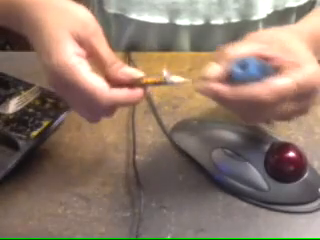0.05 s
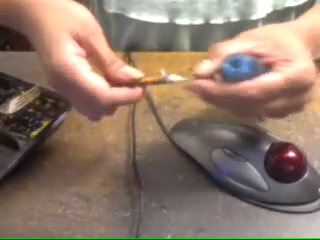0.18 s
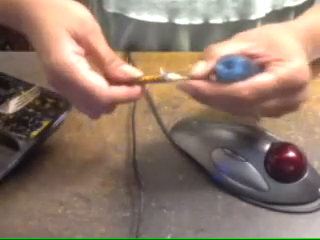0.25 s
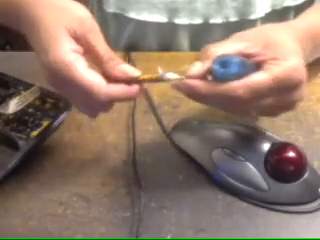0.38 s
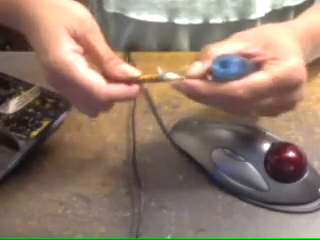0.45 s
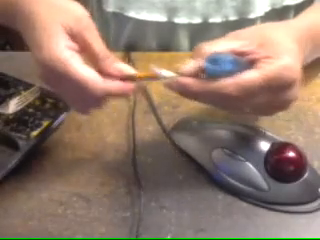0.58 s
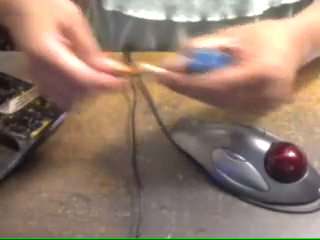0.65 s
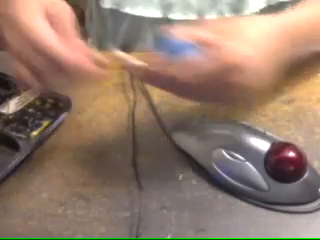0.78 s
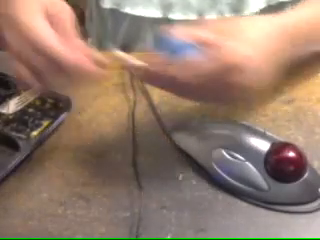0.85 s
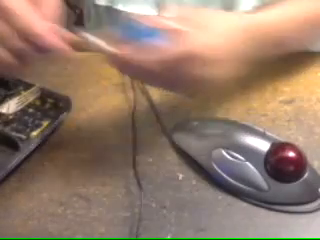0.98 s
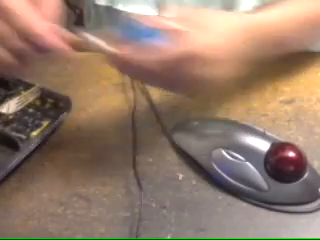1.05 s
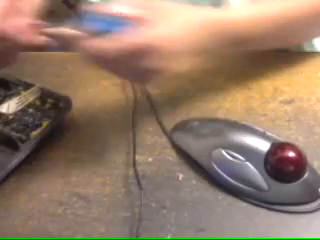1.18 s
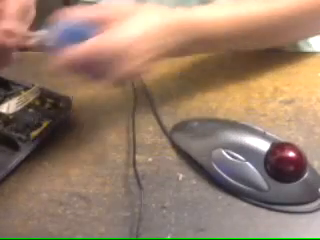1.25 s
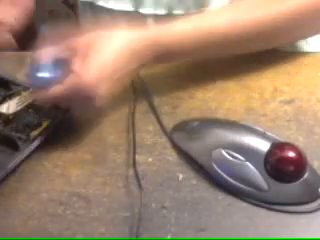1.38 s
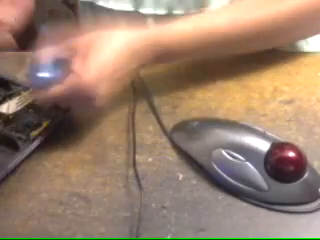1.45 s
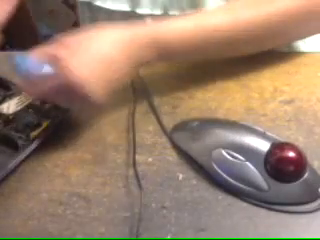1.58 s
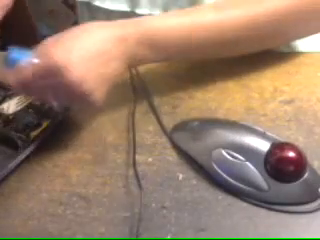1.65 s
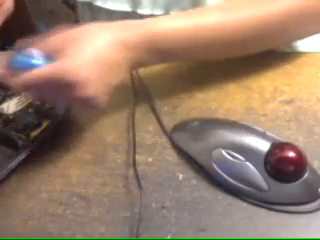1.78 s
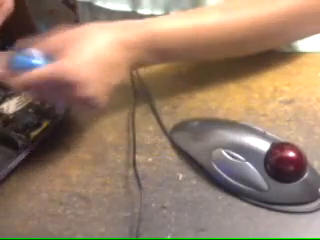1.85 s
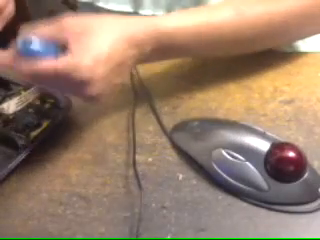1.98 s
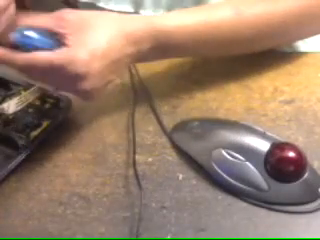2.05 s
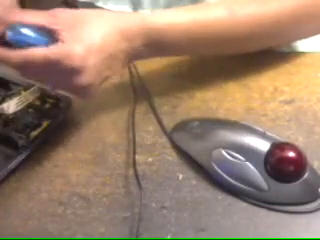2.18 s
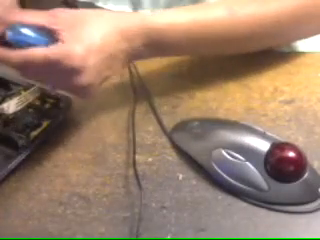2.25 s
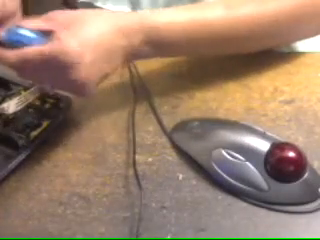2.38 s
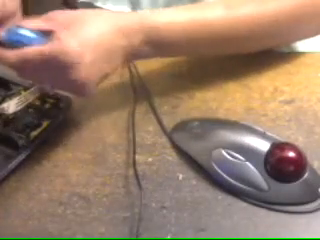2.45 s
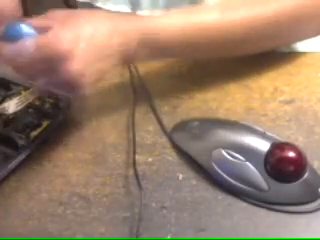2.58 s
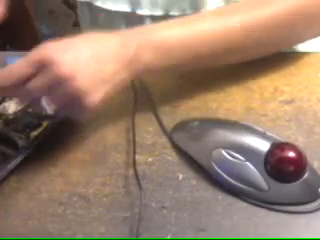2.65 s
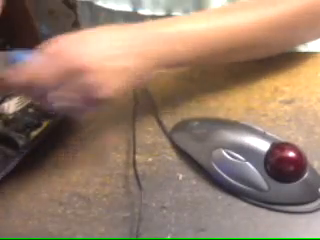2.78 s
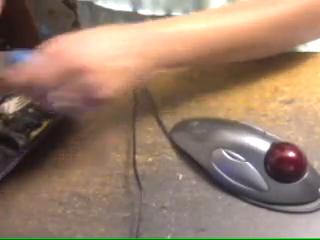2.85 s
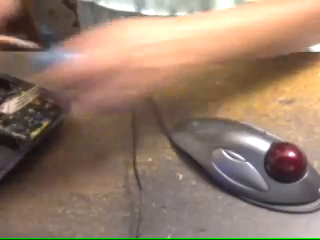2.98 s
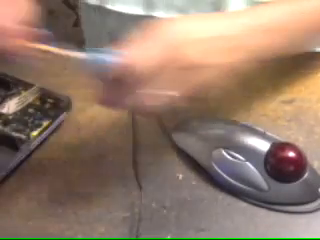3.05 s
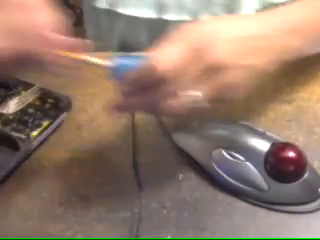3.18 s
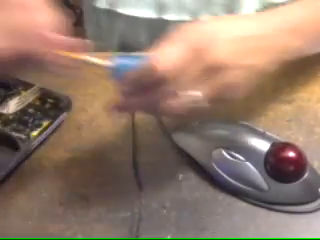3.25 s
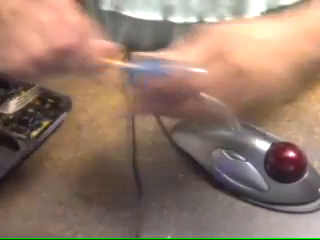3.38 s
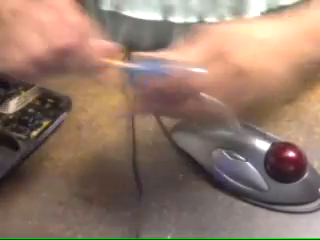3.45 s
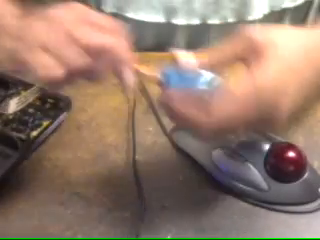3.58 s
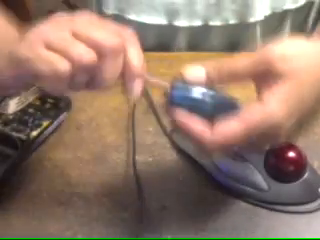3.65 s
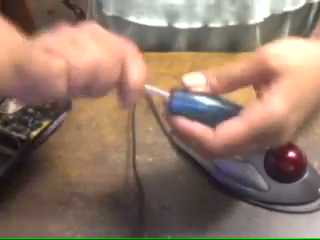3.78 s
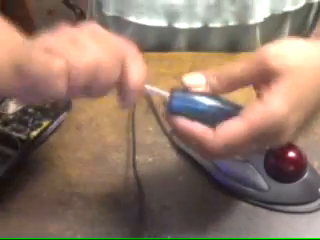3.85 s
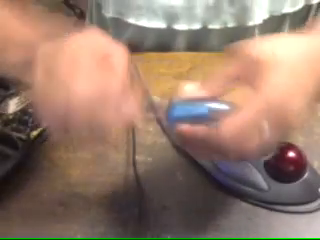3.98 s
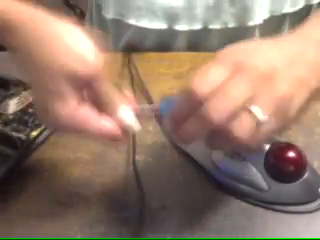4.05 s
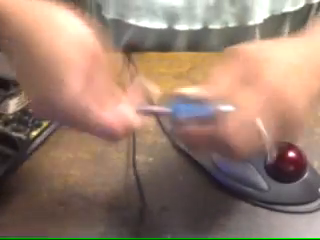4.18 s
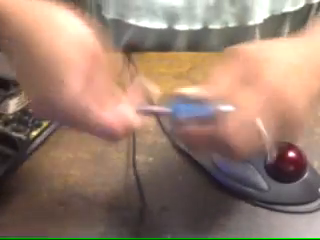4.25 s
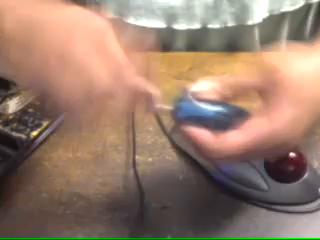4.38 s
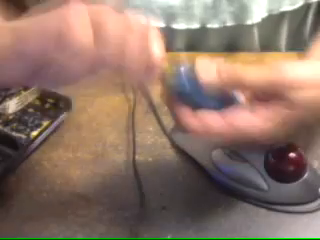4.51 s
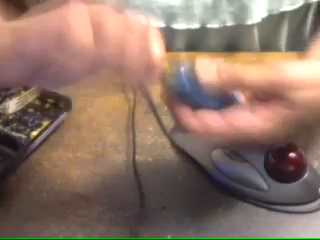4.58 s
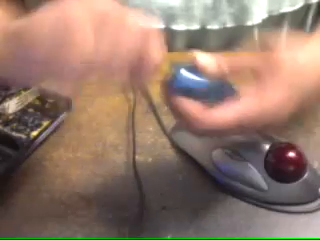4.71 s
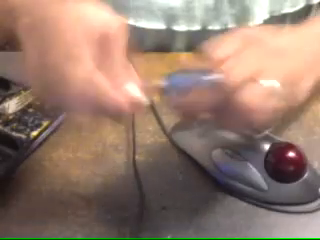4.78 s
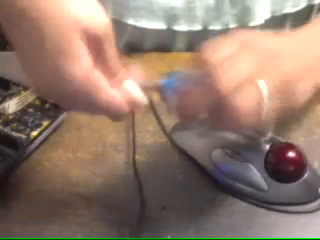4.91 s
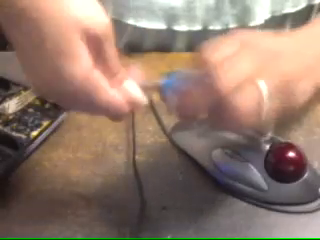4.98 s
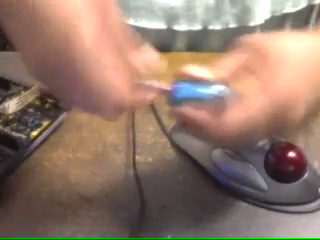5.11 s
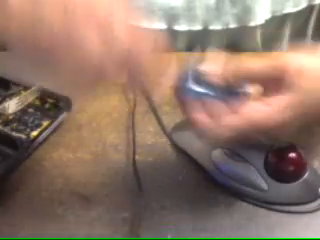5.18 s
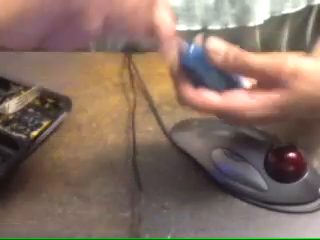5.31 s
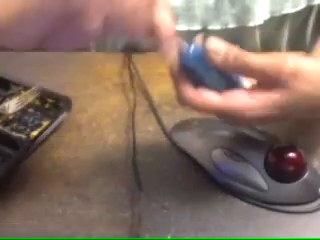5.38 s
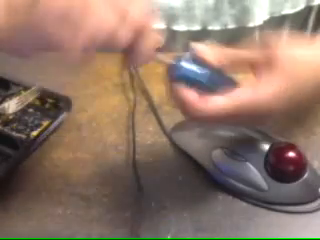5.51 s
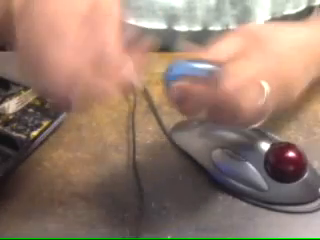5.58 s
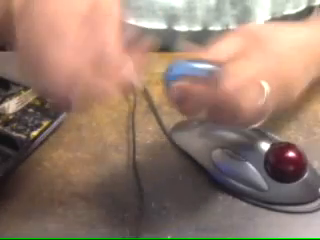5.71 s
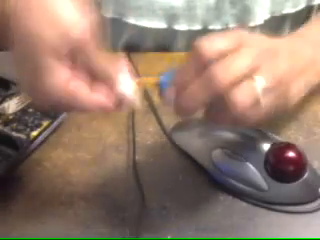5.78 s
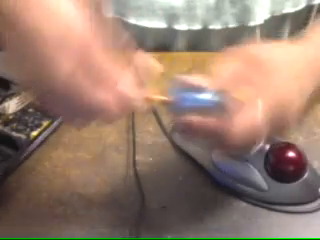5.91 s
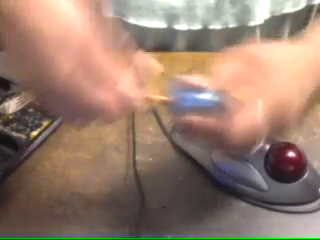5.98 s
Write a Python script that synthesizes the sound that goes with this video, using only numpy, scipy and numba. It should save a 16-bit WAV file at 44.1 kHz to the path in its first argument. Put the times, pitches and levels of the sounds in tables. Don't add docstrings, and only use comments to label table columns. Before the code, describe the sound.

A quiet room: low fan rumble, faint mains hum and a dull distant clock tick every second from about 0.5 s. Nearly nothing else until 1.2 s, when tiny plastic taps begin, clustering at 1.4 s with a light finger rub. A crisp, harder click comes at 2.0 s. Faint rubs and ticks follow at 2.5-2.9 s, then a soft slide at 3.5 s and small clicks at 3.6-3.7 s as the pencil is fitted. At 4.05-4.25 s the first twist gives a short, dry, crunchy rasp with clacks, then a knock at 4.3 s. A weaker, scratchier twist runs 4.77-5.0 s, with knocks near 4.96 s and small rattles after. A sharp clack hits at 5.28 s. The third scrape runs 5.65-5.9 s, topped at 5.73 s by the loudest knock, with a low desk thump. Close, dry, band-limited microphone with slightly watery grain.

```python
import sys
import numpy as np
from scipy import signal
from scipy.io import wavfile
from scipy.ndimage import uniform_filter1d
from numba import njit

SR = 44100
rng = np.random.default_rng(int(sys.argv[2]) if len(sys.argv) > 2 else 0)


def natural_amplitude(level_db):
    exponent = np.asarray(level_db, float) / 20
    return 10 ** exponent


def int16_out(signal):
    q = np.round(np.clip(np.atleast_2d(signal).T, -1, 1) * 32767)
    wavfile.write(sys.argv[1], SR, q.astype(np.int16))


N = 266364


@njit
def svf(x, hz, width):
    y, b, l = np.empty(len(x)), 0., 0.
    g, k = np.tan(np.pi * hz / SR), width / hz
    for i in range(len(x)):
        v = (b + g * (x[i] - l)) / (1 + g * (g + k))
        b, l, y[i] = 2 * v - b, l + 2 * g * v, k * v
    return y


def unit(x):
    return x / np.sqrt(np.mean(x ** 2))


def ring(x, modes):
    out = 0
    for k, (hz, width, db) in enumerate(modes):
        out = out + (-1) ** k * natural_amplitude(db) * svf(x, 1. * hz, 1. * width)
    return out


def walk(rate):
    hold = int(SR / rate)
    return uniform_filter1d(np.repeat(rng.standard_normal(N // hold + 1), hold), hold)[:N]


def burst(noise, rise_s, fall_s, tail_s, tail_db):
    t = np.arange(len(noise)) / SR
    decay = np.exp(-t / fall_s) + natural_amplitude(tail_db) * np.exp(-t / tail_s)
    return noise * (1 - np.exp(-t / rise_s)) * decay


def add(out, s, x):
    i = int(s * SR)
    out[i:i + len(x)] += x[:len(out) - i]


# [t/s, cutting effort level/dB, shell freedom in the grip level/dB]
TWISTS = [
    [(4.042, -75, -4), (4.066, -61, -7), (4.085, -48.5, -7), (4.1, -50, -1.5), (4.114, -39.5, -9.5),
     (4.128, -45.5, -4), (4.174, -33, -6.5), (4.232, -65, -4), (4.275, -72.5, -10.5)],
    [(4.764, -77, 0), (4.78, -57.5, -15), (4.81, -51.5, 3.5), (4.86, -58, -4), (4.895, -54.5, 2.5),
     (4.92, -44.5, -7), (4.964, -43.5, -5), (4.982, -50, -3), (5.012, -62.5, 0)],
    [(5.602, -84.5, -19.5), (5.652, -60.5, -12.5), (5.672, -44, -14), (5.684, -53.5, -9.5),
     (5.715, -53.5, -14), (5.765, -47.5, -30.5), (5.8, -54, -5), (5.875, -50.5, -1), (5.95, -72.5, -3.5)],
]
# [start level/dB, end level/dB]
TWIST_CUP_DB = [(-13, -5), (-26, -0.5), (-15, -14.5)]
# [t/s, level/dB, time to fade 30 dB/s, shell level/dB, blade level/dB]
SLIDES = [(.142, -70, 0.1, -26, 8), (1.447, -65.5, 0.15, -3.5, 6), (1.777, -72, 0.09, 6.5, 5),
          (2.49, -94, 0.1, 11, 7), (2.605, -74.5, 0.07, 3, 14.5), (2.635, -69.5, .07, -1, 12),
          (2.876, -68.5, 0.05, -22, 10.5), (3.1, -90.5, 0.12, 3.5, 9), (3.475, -61, 0.07, -9, 6.5),
          (3.58, -82, 0.24, 2, 5), (3.69, -62, 0.06, -11, 3.5), (3.75, -80.5, 0.2, -8, 1),
          (4.45, -83, 0.09, -4, 24.5), (3.99, -82, 0.3, -4, 10), (4.67, -84, 0.16, -3.5, 13.5),
          (5.035, -61.5, 0.04, -3.5, -3), (4.37, -82, .15, 0, 0), (5.42, -90.5, 0.55, 0, 12),
          (4.59, -87.5, -0.1, -1, 4.5)]
# [t/s, level/dB, time to fade 30 dB/s, shell level/dB, blade level/dB]
SHAKES = [(1.39, -76.5, .1, -18, 12), (1.611, -75.5, .05, -10, 9.5), (2.79, -65.5, 0.042, -9, 6),
          (3.626, -67.5, .09, -15, 2), (4.416, -71.5, .07, 3.5, 5.5), (4.516, -52, .025, -12, 5),
          (5.085, -52, .018, -6, 0.5), (5.158, -57.5, .05, 0, 3.5), (5.3, -53.5, .06, -1.5, -6),
          (5.33, -62, .1, -12, -8)]


def pressure(twist_fade_db_per_s=450, edge_db=7.5, edge_per_effort=-.3, rub_cup_db=-4):
    t, gain = np.arange(N) / SR, np.zeros((4, N))
    for rows, cup_db in zip(map(np.array, TWISTS), TWIST_CUP_DB):
        s, effort_db, free_db = rows.T
        outside_s = np.maximum(np.maximum(s[0] - t, t - s[-1]), 0)
        wall_db = np.interp(t, s, effort_db) - twist_fade_db_per_s * outside_s
        shell_db = wall_db + np.interp(t, s, free_db)
        twist_cup_db = shell_db + np.interp(t, s[[0, -1]], cup_db)
        blade_db = wall_db + edge_db + edge_per_effort * (np.maximum(wall_db, -66) + 55.5)
        gain += natural_amplitude(np.array([twist_cup_db, shell_db, wall_db, blade_db]))
    for rows, rise in ((SLIDES, .8), (SHAKES, .15)):
        for s, db, fade_s, shell_db, blade_db in rows:
            near = slice(max(int((s - 2 * fade_s) * SR), 0), int((s + 2 * fade_s) * SR))
            swell_db = db - 30 * np.maximum((s - t[near]) / rise, t[near] - s) / fade_s
            parts_db = np.array([[shell_db + rub_cup_db], [shell_db], [0], [blade_db]])
            gain[:, near] += natural_amplitude(swell_db + parts_db)
    return gain


# [f/Hz, width/Hz, level/dB]
CUP = [(732, 266, -0.5), (1262, 480, 1)]
# [f/Hz, width/Hz, level/dB]
GRIPPED = [(1610, 330, -3), (2105, 300, 3), (2680, 500, -2)]
# [f/Hz, width/Hz, level/dB]
WALL = [(3328, 277, 3.5), (3923, 450, 6), (4360, 220, 7), (4817, 590, 3), (5263, 450, -4)]
# [f/Hz, width/Hz, level/dB]
BLADE = [(5683, 720, -8), (6227, 340, -4), (6700, 610, -5), (7435, 396, -3)]


def shaving(slips=2500, scatter_db=4.0, hiss_db=1.5, patchy_db=3.0):
    when = rng.random(N) < slips / SR
    strength = natural_amplitude(scatter_db * np.minimum(rng.exponential(size=N), 2.5))
    torn = when * strength * rng.standard_normal(N)
    force = unit(torn) + natural_amplitude(hiss_db) * rng.standard_normal(N)
    force = force * natural_amplitude(3.8 * walk(90))
    out = 0
    for gain, modes in zip(pressure(), (CUP, GRIPPED, WALL, BLADE)):
        once = ring(force, modes)
        answer = 0
        for k, mode in enumerate(modes):
            answer = answer + (-1) ** k * natural_amplitude(patchy_db * walk(22)) * ring(once, [mode])
        out = out + gain * unit(answer)
    return out


# [f/Hz, width/Hz, level/dB]
SHELL = [(1593, 350, 0.5), (2073, 400, 1.5), (2722, 500, -3)]
# [t/s, level/dB, shell level/dB, blade level/dB]
TAPS = [(1.192, -65, -12, 15.5), (1.274, -54, -20.5, 13), (1.389, -66.5, -12.5, 12.5),
        (1.403, -58, -22, 11.5), (1.417, -65, -19, 6), (1.428, -50.5, -14, 9), (1.439, -42.5, -8, 11),
        (1.448, -47, 1, 10), (1.537, -73.5, 10.5, 10.5), (1.608, -74, 0, 21), (2.074, -66, 5, 2),
        (2.456, -84.5, 26.5, 15), (2.781, -52.5, -11, 10), (3.566, -72.5, 11, 16),
        (3.627, -46.5, -20, -0.5), (3.693, -49.5, -20.5, -17), (3.984, -72.5, -13, 20.5)]
# [t/s, level/dB, shell level/dB, blade level/dB]
KNOCKS = [(4.112, -31, -5.5, -3.5), (4.164, -25, -13, -1.5), (4.175, -25, -2.5, 6.5),
          (4.302, -31, 1.5, -2.5), (4.958, -32, -8, 6.5), (4.967, -44, -1, 11.5), (5.07, -39, 0.5, -18),
          (5.2745, -49.5, 0.5, -4), (5.277, -20, -5.5, -7.5), (5.719, -29.5, -13.5, 1),
          (5.728, -14.5, -6.5, 0.5), (5.746, -60.5, -14, 10)]
# [t/s, level/dB, shell level/dB, blade
# level/dB]
DRY_CONTACTS = [(2.022, -32, -7, -3.5), (4.064, -47, -3, 2), (4.191, -45, 4, -0.5), (4.414, -58.5, -3, 0),
                (4.514, -47.5, -6.5, 8.5), (4.783, -46, -12, -1), (4.807, -53.5, 15, 15.5), (4.858, -54.5, 2, 8),
                (4.885, -44.5, -0.5, 7), (4.935, -41.5, 3, -5), (4.946, -33.5, -8.5, -10),
                (5.155, -52.5, 4, 5.5), (5.186, -68, 6, 22), (5.67, -29, -13.5, 2.5), (5.845, -49.5, 4.5, 10.5)]
# [t/s, level/dB, shell level/dB, blade level/dB]
BUMPS = [
    (1.776, -74, 13.5, 18.5),
    (3.468, -72, 6, 4),
    (3.495, -75.5, 8, 2),
    (4.936, -59.5, 9, 16),
    (5.087, -65.5, 7.5, 12.5),
]


def knocks(desk_s=.0042, desk_db=-12):
    out = np.zeros(N)
    wall_ring = [(3754, 130, 14)]
    contacts = ((TAPS, -3), (KNOCKS, -6), (DRY_CONTACTS, -19), (BUMPS, 7.5))
    for rows, cup_db in contacts:
        wall = WALL + wall_ring * (rows is KNOCKS)
        for (s, db, shell_db, blade_db), noise in zip(rows, rng.standard_normal((30, 4096))):
            hardest_db = db + max(0, shell_db, blade_db)
            fall_s = .0009 * natural_amplitude(.08 * (hardest_db + 38))
            push = burst(noise, .0004, fall_s, .008, -21.5)
            levels_db = (shell_db + cup_db, shell_db, 0, blade_db)
            for modes, rel_db in zip((CUP, SHELL, wall, BLADE), levels_db):
                x = ring(push, modes)
                add(out, s, x / np.abs(x).max() * natural_amplitude(db + rel_db + 4.0))
    return out + natural_amplitude(desk_db) * np.roll(out, int(desk_s * SR))


# [t/s, level/dB]
THUMP = [
    (5.728, -30.5),
    (3.6, -60.5),
    (4.959, -52.5),
]
# [f/Hz, width/Hz, level/dB]
DESK = [(109, 46, -2.5), (189, 110, -1.5), (291, 86, 4), (474, 300, -3.5)]


def thumps():
    out = np.zeros(N)
    push = np.r_[np.hanning(40), np.zeros(4000)]
    boom = ring(push, DESK)
    for s, db in THUMP:
        add(out, s, natural_amplitude(db) * boom / np.abs(boom).max())
    return out


CLOCK_DB = [-62.5, -58.5, -66, -65.5, -65, -64]
# [f/Hz, width/Hz, level/dB]
CLOCK = [(590, 136, 3.5), (1080, 100, 2)]


def clock(first_s=.478):
    out, noise = np.zeros(N), rng.standard_normal((6, 6000))
    for k, db in enumerate(CLOCK_DB):
        tick = ring(burst(noise[k], 0.0056, 0.022, 0.055, -30.5), CLOCK)
        add(out, first_s + k, natural_amplitude(db) * 10 * tick)
    return out


# [f/Hz, level per Hz/dB]
ROOM = [(25, -57), (40, -39.5), (55, -15), (80, -18.5), (105, -11.5), (150, -4.5), (190, 0), (250, -11.5),
        (550, -18), (1400, -24.5), (3000, -32.5), (5800, -35.5), (8000, -47)]


def room(room_db=-64.5, hum_hz=120.1, hum_db=-69):
    hz_db, out = np.array(ROOM), 0
    for hz in 30 * 2 ** np.arange(0, 8.1, 1 / 3):
        density_db = np.interp(np.log(hz), np.log(hz_db[:, 0]), hz_db[:, 1])
        db = density_db + 10 * np.log10(hz) + 1.6 * walk(8)
        third = svf(svf(rng.standard_normal(N), hz, hz / 3), hz, hz / 3)
        out = out + natural_amplitude(db) * unit(third)
    phase = 2 * np.pi * hum_hz * np.arange(N) / SR + 0.19 * walk(6.7)
    hum = np.sqrt(2) * np.sin(phase)
    return natural_amplitude(room_db) * unit(out) + natural_amplitude(hum_db + 1.1 * walk(7.9)) * hum


def scene():
    return (shaving() + knocks() + thumps() + clock() + room())[None]


def thin(x, step_db=-64.5, tilt_db=-4.5, follow=.3, mask_db=-11, wobble_db=3.5, dead=.7, recover=.8):
    size, start, bins = 1024, 92, 390
    n, k = np.arange(2 * size) + .5, np.arange(bins) + .5
    window = np.sin(np.pi * n / (2 * size))[:, None]
    basis = window * np.cos(np.pi / size * np.outer(n + size / 2, k)) * np.sqrt(2 / size)
    starts = np.arange(len(x) // size + 2) * size
    pad = np.r_[np.zeros(size + start), x, np.zeros(3 * size)]
    lines = pad[starts[:, None] + np.arange(2 * size)] @ basis
    loud = np.mean(lines ** 2, axis=1, keepdims=True)
    loud_db = np.maximum(10 * np.log10(loud / np.median(loud) + 1e-9), 0)
    loud_db = np.maximum(loud_db, signal.lfilter([1 - recover], [1, -recover], loud_db, axis=0))
    patches = uniform_filter1d(rng.standard_normal((len(starts), bins // 6)), size=9, axis=0) * 3
    wander_db = (wobble_db + .07 * loud_db) * np.repeat(patches, 6, axis=1)
    step = natural_amplitude(step_db + wander_db + tilt_db * k / bins + follow * loud_db)
    band_rms = np.sqrt(uniform_filter1d(lines ** 2, size=24, axis=1))
    step = np.maximum(step, natural_amplitude(mask_db) * band_rms)
    rounded = np.sign(lines) * np.floor(np.abs(lines) / step + 1 - dead) * step
    out = np.zeros(len(pad))
    for s, block in zip(starts, rounded @ basis.T):
        out[s:s + 2 * size] += block
    return out[size + start:][:len(x)]


def band(lo_hz, hi_hz):
    sos = signal.cheby2(6, 40, [lo_hz, hi_hz], "bandpass", fs=SR, output="sos")
    return unit(signal.sosfilt(sos, rng.standard_normal(N)))


def top_cut(x):
    return signal.sosfilt(signal.butter(12, 15720, fs=SR, output="sos"), x)


def record(dry):
    cut = signal.cheby2(10, 60, 7837 * 1.121, fs=SR, output="sos")
    x = thin(signal.sosfilt(cut, dry[0]))
    power = uniform_filter1d(x ** 2, size=1024)
    spill = natural_amplitude(-48.5) * (power - natural_amplitude(-119)).clip(0) ** 0.37
    hiss_gain = natural_amplitude(-104) + natural_amplitude(2.5) * spill * np.minimum(natural_amplitude(65) * spill, 1)
    hiss = rng.standard_normal(N) * hiss_gain
    shelf = natural_amplitude(-5.5) * spill * band(7600, 9900)
    whine = band(14300, 16000) * (natural_amplitude(-103) + natural_amplitude(-10.0) * spill)
    return top_cut((x + hiss + shelf + whine)[None])


dry = scene()
out = record(dry)
int16_out(out)
```